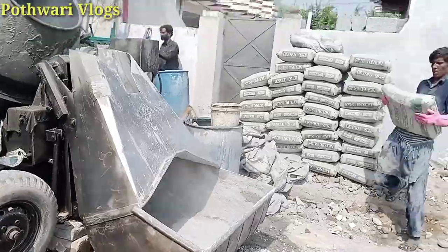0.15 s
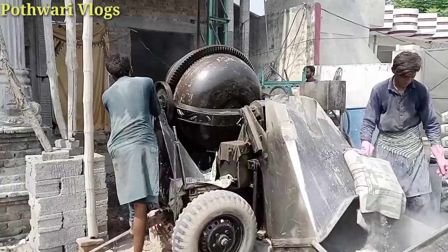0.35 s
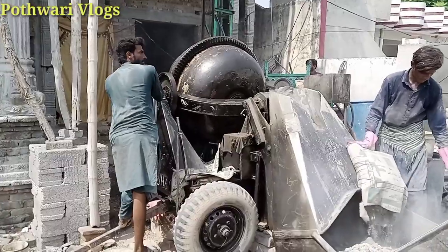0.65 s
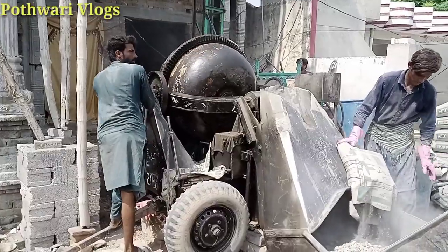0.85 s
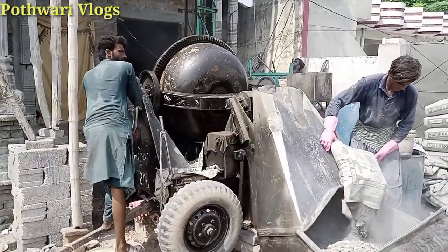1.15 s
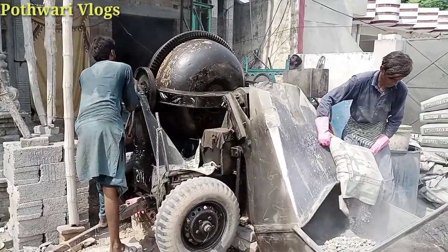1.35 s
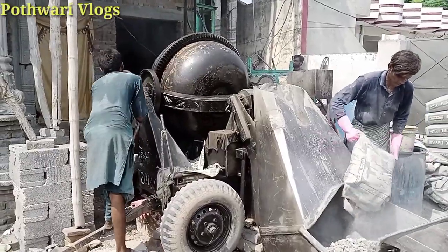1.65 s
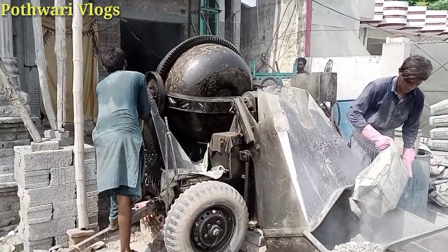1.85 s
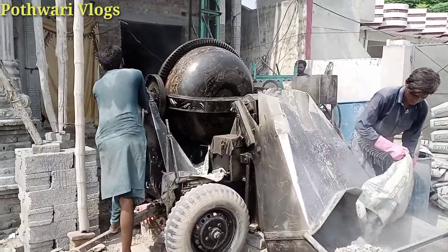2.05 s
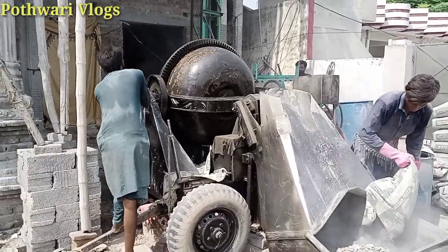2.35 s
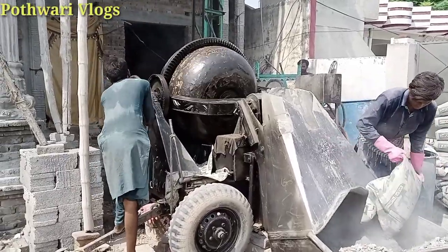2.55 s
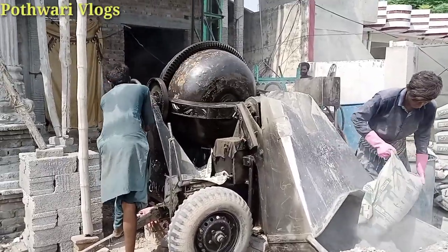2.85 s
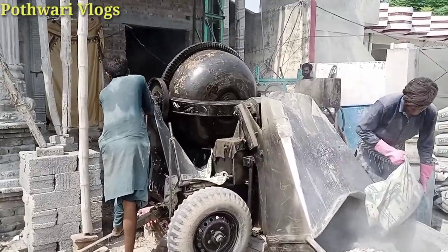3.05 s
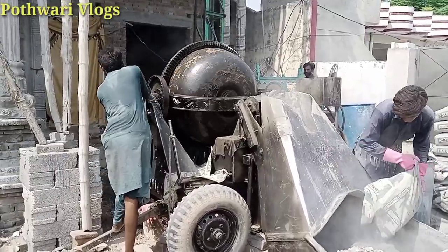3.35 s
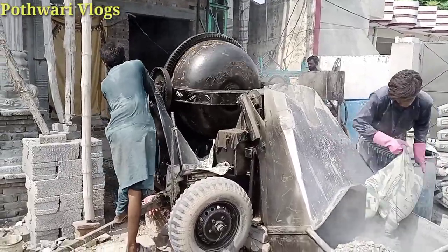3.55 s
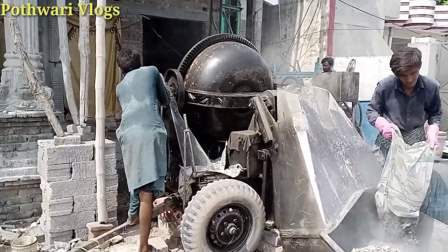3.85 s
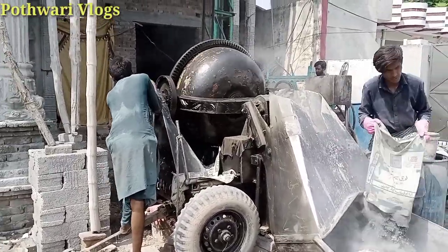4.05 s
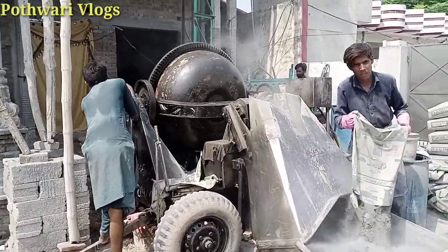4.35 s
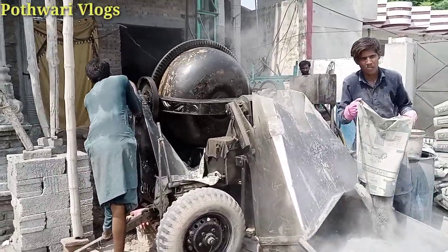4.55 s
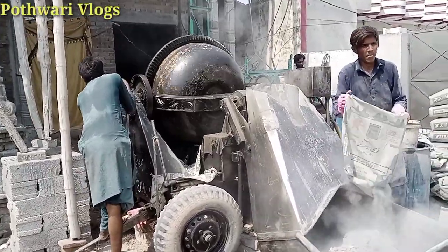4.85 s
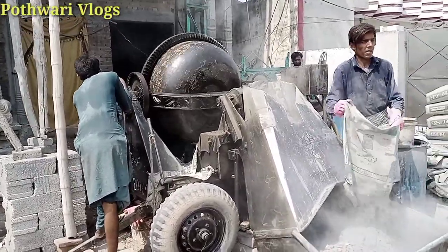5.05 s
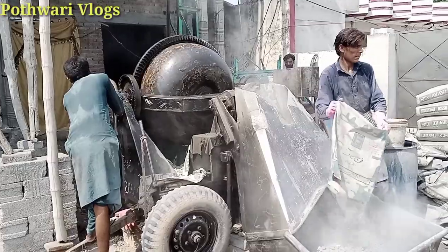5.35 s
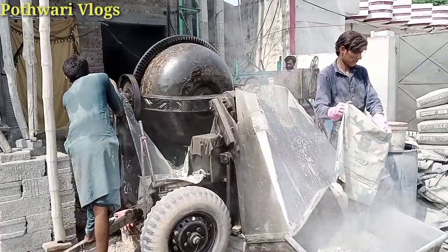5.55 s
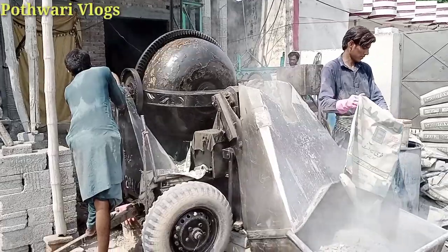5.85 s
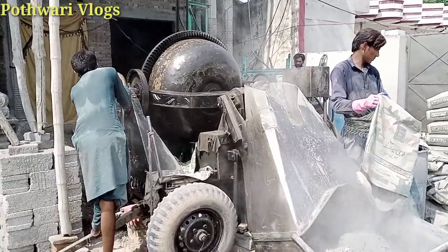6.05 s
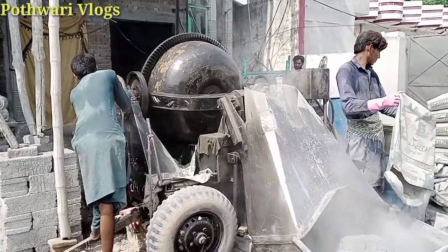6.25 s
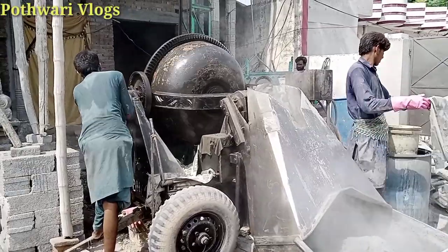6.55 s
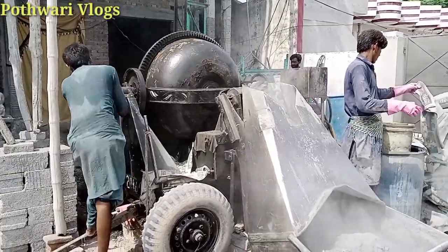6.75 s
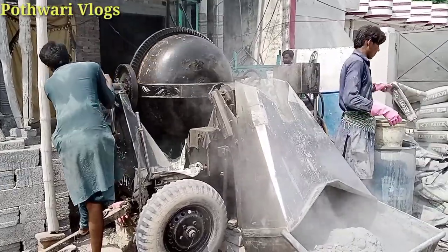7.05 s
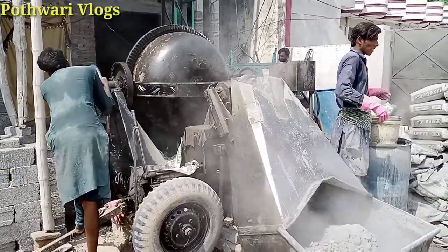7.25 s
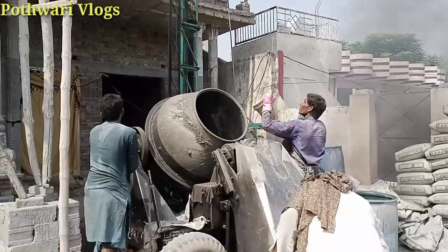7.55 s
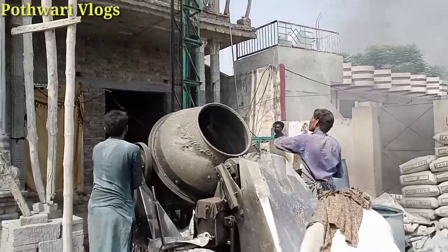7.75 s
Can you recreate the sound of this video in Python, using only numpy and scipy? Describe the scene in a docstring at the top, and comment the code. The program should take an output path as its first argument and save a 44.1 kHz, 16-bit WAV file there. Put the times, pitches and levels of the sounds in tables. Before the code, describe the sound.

A small diesel engine chugs and clatters steadily on a churning concrete mixer, with a couple of bumps on its steel hopper.

```python
"""A concrete mixer on an open building site. From the start the drum churns, its ring gear grinds and its shell
hums now and then; grit rattles briefly in the steel hopper under a few light bumps. A single-cylinder diesel
fires about ten times a second: an injector tick, then an exhaust thud and a combustion knock that sets the
casing clattering. The hopper is bumped hard at 1.8 s and more softly, with a dull thud, at 5.8 s. From 7.6 s
the engine is closer and faster, about 14 firings a second."""
import sys
import numpy as np
from scipy import signal
from scipy.fft import rfft, irfft, next_fast_len
from scipy.io import wavfile

SR = 44100
rng = np.random.default_rng(int(sys.argv[2]) if len(sys.argv) > 2 else 0)


def wrap_up_sound(samples):
    """Save the sound to the file named by the first command line argument, as 16-bit audio."""
    columns = np.atleast_2d(samples).T
    # keep every value between -1 and 1, then stretch to whole-number steps
    tamed = np.clip(columns, -1, 1)
    steps = np.round(tamed * 32767).astype(np.int16)
    wavfile.write(sys.argv[1], SR, steps)


N = 348554
TIME = np.arange(N) / SR

# Contacts of one firing, injector first. Each row: lag after the knock in seconds, ring in dB, crack in dB.
CONTACTS = [(-.0105, -13.5, -4.5), (0.0, -4, 0.5), (.009, -3.5, -1), (.019, -3, -3), (.034, -5, -4)]
# Colour of casing and guards. Each row: frequency in Hz, relative level in dB.
CASING_COLOUR = [(200, -50), (550, -48), (1150, -20), (1400, -11), (1850, -12), (2300, -4.5), (2900, -9),
                 (3600, -11.5), (5000, -9.5), (7100, -8.5), (8100, -22), (10000, -31), (13000, -71),
                 (15300, -32.5)]
# Decay of their clatter. Each row: frequency in Hz, t60 in seconds.
CASING_DECAY = [(300, 0.22), (1400, 0.19), (2500, 0.22), (4000, 0.22), (7000, 0.15), (9000, 0.13),
                (15000, 0.024)]


def from_db(db):
    """Decibels to gain."""
    return 10 ** (np.asarray(db) / 20)


def at_time(points, times=TIME):
    """Read a table on a time axis."""
    return np.interp(times, *np.transpose(points))


def at_hz(points, hz):
    """Read a table on a log-frequency axis."""
    f, value = np.transpose(points)
    return np.interp(np.log(np.maximum(hz, 1e-3)), np.log(f), value)


def noise(colour):
    """Coloured noise, rms 1."""
    size = next_fast_len(N)
    gain = from_db(at_hz(colour, np.fft.rfftfreq(size, 1 / SR)))
    x = irfft(rfft(rng.standard_normal(size)) * gain, size)[:N]
    return x / np.std(x)


def drift(rate_hz):
    """Random wander, standard deviation 1."""
    knots = rng.standard_normal(8000)
    x = np.interp(TIME * rate_hz, np.arange(len(knots)), knots)
    return x / np.std(x)


def clicks(times, sizes):
    """Single-sample impulses."""
    at = np.round(np.ravel(times) * SR).astype(int)
    inside = (at >= 0) & (at < N)
    return np.bincount(at[inside], np.ravel(sizes)[inside], N) + 1e-18


def ring(hits, hz, t60_s):
    """One mode: a unit click starts a decaying sine of height 1."""
    r, w = np.exp(-np.log(1000) / (t60_s * SR)), 2 * np.pi * hz / SR
    return signal.lfilter([0, np.sin(w)], [1, -2 * r * np.cos(w), r * r], hits)


def decay(energy, t60_s):
    """Amplitude of a body that stores each blow's energy and loses it exponentially."""
    retained = np.exp(-2 * np.log(1000) / (t60_s * SR))
    return np.sqrt(signal.lfilter([1], [1, -retained], energy))


def drum():
    """The drum churns while its ring gear grinds in a narrow band."""
    # Each row: frequency in Hz, relative level in dB.
    churn_colour = [(24, -35), (40, -38), (95, -9), (191, 0), (554, -13), (866, -2.5), (1200, -7.5),
                    (1420, 1), (1870, 3.5), (2640, 4.5), (5040, -4.5), (5560, -12.5), (6780, -5),
                    (11700, -49), (15000, -36)]
    gear_colour = [(900, -70), (1220, -6), (1330, 7), (1480, 9), (1650, -12.5), (2100, -43), (4000, -37)]
    # Each row: time in seconds, level in dB.
    levels = [(0.0, -37), (0.2, -41), (1.2, -38), (1.9, -37), (2.8, -38.5), (5.0, -37.5), (7.4, -37.5),
              (7.7, -44.5)]
    gear = noise(gear_colour)
    churn = from_db(1.25 * drift(70)) * noise(churn_colour)
    gear *= from_db(-9 + 1.5 * drift(30))
    return (churn + gear) * from_db(at_time(levels))


def grit():
    """Loose grit rattles dully on the hopper plate."""
    # Each row: time in seconds, level in dB.
    levels = [(0, -44), (.06, -43), (.1, -37), (.2, -38), (.32, -38), (.4, -46), (.5, -90)]
    # Each row: frequency in Hz, relative level in dB.
    colour = [(600, -21), (1500, -3), (2100, -1.5), (2450, 2.5), (3000, -25), (6000, -45), (11000, -75)]
    return from_db(at_time(levels) + 2.6 * drift(120)) * noise(colour)


def drum_hums(faint_per_s=4.2, swell_s=.027):
    """The turning drum's shell swells into short, rough, hollow rings."""
    # Each row: peak time in seconds, pitch in Hz, level in dB.
    loud_hums = [(0.78, 715, -40), (0.94, 724, -43), (0.98, 1415, -42), (4.0, 1285, -40),
                 (4.589, 796, -43.5), (5.32, 721, -39), (6.051, 1320, -38.5), (6.18, 717, -43.5),
                 (6.36, 1275, -39), (6.58, 710, -45)]
    # Each row: frequency in Hz, level in dB.
    shell_modes = [(718, -45), (800, -50), (890, -48), (1350, -44)]
    waver_cycles = .1 * drift(150)
    faint_hums = []
    for slot, (offset, pick, luck) in enumerate(rng.random((80, 3))):
        s = (slot + offset) / faint_per_s
        hz, db = shell_modes[int(pick * len(shell_modes))]
        if s < TIME[-1]:
            faint_hums.append((s, hz, db + 2 * luck - 1))
    out = np.zeros(N)
    for s, hz, db in loud_hums + faint_hums:
        span = np.abs(TIME - s) < .2
        t = TIME[span] - s
        swell = from_db(db) * np.exp(-(t / swell_s) ** 2 / 2)
        out[span] += swell * np.sin(2 * np.pi * (hz * t + waver_cycles[span]))
    return out * from_db(2.5 * drift(110))


def firings(first_s=.089, spread_db=(2.04, 1.93, 1)):
    """One firing per engine cycle. Returns times in seconds and ring, crack and thud levels in dB."""
    # Each row: time in seconds, firings per second.
    speed = [(0.0, 10.163), (0.36, 10.159), (0.43, 11.584), (0.7, 9.983), (1.5, 9.815), (2.4, 9.589),
             (3.3, 9.611), (4.2, 9.631), (4.9, 9.541), (5.5, 9.658), (6.5, 9.646), (7.53, 9.664),
             (7.58, 14.339)]
    # Each row: time in seconds, metallic ring in dB, sharp crack in dB, exhaust thud in dB.
    effort = [(0.1, -35, -52, -50), (0.38, -42, -46.5, -55), (0.75, -32.5, -35, -54.5),
              (1.25, -35.5, -40.5, -55), (2.0, -30.5, -33, -46.5), (2.75, -33, -36, -51.5),
              (3.25, -30, -31, -52), (3.7, -31, -34, -52), (4.2, -28.5, -32.5, -49.5),
              (4.8, -33, -35, -51.5), (5.3, -30.5, -31.5, -52.5), (5.8, -34, -35, -49.5),
              (6.3, -31.5, -34.5, -48), (6.9, -30, -33.5, -55.5), (7.48, -37, -39, -51.5),
              (7.58, -35, -33, -51.5), (7.7, -29.5, -22, -43.5), (7.9, -27.5, -23, -49)]
    # Each row: time in seconds, extra ring in dB, extra crack in dB.
    hard_knocks = [(1.98, 0, 1.5), (2.29, 3, 0.5), (2.6, 3.5, 0), (4.16, 3.5, 0), (4.89, 7.5, -1.5),
                   (5.2, 4, -1.5), (6.24, 2, 3), (6.97, 2, 6), (7.38, 9.5, 6.5)]
    cycles = np.cumsum(at_time(speed)) / SR
    cycles -= np.interp(first_s, TIME, cycles)
    s = np.interp(np.arange(int(cycles[-1]) + 1), cycles, TIME)
    effort_s, *effort_db = np.transpose(effort)
    level_db = np.transpose([np.interp(s, effort_s, column) for column in effort_db])
    level_db += np.sqrt(3) * rng.uniform(-1, 1, level_db.shape) * spread_db
    for knock_s, ring_db, crack_db in hard_knocks:
        level_db[np.argmin(abs(s - knock_s))] += [ring_db, crack_db, 0]
    return (s, *level_db.T)


def nearness(times):
    """How close the engine is."""
    # Each row: time in seconds, nearness from 0 to 1.
    approach = [(7.565, 0), (7.7, 1)]
    return at_time(approach, times)


def pipes(fired, gulp_t60_s=.17):
    """Gulps of air set the intake and exhaust pipes hooting."""
    # Each row: frequency in Hz, lag after the knock in seconds, level in dB, t60 in seconds.
    pipe_modes = [(878.5, -0.032, -42, 0.098), (714, .012, -42.5, 0.048), (922, -0.0013, -64, 0.13),
                  (720, 0.019, -50, .16), (337.6, -0.0079, -59, 0.21), (489, -0.036, -63, 0.26)]
    # Each row: time in seconds, gain in dB.
    hoot_gain = [(0, 1), (.8, -2.5), (1.5, -4), (2.1, -3.5), (3.8, -1.5), (4.5, 0), (6.5, 2), (7.4, 0),
                 (7.7, -13)]
    s, out = fired[0], np.zeros(N)
    gulp_norm = np.sqrt(gulp_t60_s * SR / (2 * np.log(1000)))
    for hz, lag_s, db, t60_s in pipe_modes:
        sizes = from_db(db + at_time(hoot_gain, s) + 2 * rng.uniform(-.53, 1, len(s)))
        gulps = decay(clicks(s + lag_s, sizes ** 2), gulp_t60_s) * rng.standard_normal(N)
        out += ring(gulps / gulp_norm, hz, t60_s)
    return out


def hopper(thud_t60_s=.22, boom_t60_s=.21, scrape_t60_s=.26, push_t60_s=.07):
    """A bump swells as the load settles; the plate thuds, booms, clangs and is scraped by grit."""
    # Each row: peak time in seconds, thud, boom, clang and scrape in dB, rise in seconds.
    bumps = [(0.074, -62, -59, -36.5, -40, .006), (.1, -44, -61, -36.5, -40, .006),
             (0.254, -61, -58, -48, -52, 0.0065), (.3, -58, -49, -41, -46, 0.011),
             (.335, -62, -51, -38.5, -59, 0.014), (1.77, -48, -43, -44, -30, 0.021),
             (1.799, -46, -24.5, -41.5, -24, 0.021), (1.826, -39, -33, -45, -26.5, .006),
             (1.85, -34.5, -35, -52, -29, .008), (5.825, -33.5, -65, -41, -38, 0.035)]
    # Each row: frequency in Hz, level in dB, t60 in seconds.
    plate_modes = [(776, -5, 0.21), (854, -8.5, 0.22), (850, -1, 0.19), (922.5, 8.5, 0.12),
                   (1350, -7, 0.46), (1718, 6.5, 0.076)]
    # Three colours. Each row: frequency in Hz, relative level in dB.
    thud_colour = [(60, -28), (130, -21), (200, 0), (320, -2), (430, -17), (800, -67), (5000, -81)]
    boom_colour = [(150, -40), (270, -10), (340, 1), (410, -7.5), (490, -7), (580, -8), (740, -7),
                   (1150, -14), (2000, -28), (8000, -70)]
    scrape_colour = [(400, -32), (1100, -8.5), (1450, 4), (2000, -1.5), (3200, -7), (4800, -0.5),
                     (7200, -11), (9000, -31), (14000, -47)]
    thud_power, boom_power, scrape_power, push = np.zeros((4, N))
    for s, thud_db, boom_db, clang_db, scrape_db, rise_s in bumps:
        swell = np.exp(np.clip((TIME - s) * 2 / rise_s, -20, 0))
        age_s = np.clip(TIME - s, 0, .5)
        thud_power += (swell * from_db(thud_db - 60 * age_s / thud_t60_s)) ** 2
        boom_power += (swell * from_db(boom_db - 60 * age_s / boom_t60_s)) ** 2
        scrape_power += (swell * from_db(scrape_db - 60 * age_s / scrape_t60_s)) ** 2
        force = swell * from_db(-60 * age_s / push_t60_s)
        push += from_db(clang_db) * force / np.linalg.norm(force)
    clang = sum(from_db(db) * ring(push * rng.standard_normal(N) + 1e-18, hz, t60_s)
                for hz, db, t60_s in plate_modes)
    scrape = np.sqrt(scrape_power) * noise(scrape_colour) * from_db(2.5 * drift(300))
    thud = np.sqrt(thud_power) * noise(thud_colour)
    boom = np.sqrt(boom_power) * noise(boom_colour)
    return thud + boom + scrape + clang


def pings(times, level_db, centre_hz, scatter_hz, t60_s, spread_db, rise_s=.00024):
    """One metallic ping per firing, scattered in pitch and strength."""
    out, t = np.zeros(N + SR), np.arange(SR // 5) / SR
    envelope = (1 - np.exp(-t / rise_s)) * from_db(-60 * t / t60_s)
    for s, db, (detune, luck) in zip(times, level_db, rng.uniform(-.948, 1, (len(times), 2))):
        at = int(s * SR)
        tone = np.sin(2 * np.pi * (centre_hz + scatter_hz * detune) * t)
        out[at:at + len(t)] += from_db(db + spread_db * luck) * envelope * tone
    return out[:N]


def injector_and_piston(fired):
    """The injector ticks; the piston then slaps the liner with a clank and a clink, and rebounds."""
    s, ring_db, crack_db, _ = fired
    tick_s, rebound_s = s + CONTACTS[0][0], s + CONTACTS[3][0]
    capped_db = np.minimum(crack_db, -31)
    tick = pings(tick_s, capped_db - 7, centre_hz=8140, scatter_hz=1440, t60_s=.064, spread_db=7.5)
    clank = pings(s, ring_db + 4.5, centre_hz=2950, scatter_hz=349, t60_s=.085, spread_db=3.5)
    clink = pings(s, capped_db - .5, centre_hz=5950, scatter_hz=1500, t60_s=.088, spread_db=6.5)
    rebound = pings(rebound_s, ring_db - .5, centre_hz=2526, scatter_hz=328, t60_s=.21, spread_db=7)
    return tick + clank + clink + rebound


def contact_sizes(fired, hz, spread_db, near_tick_db=6):
    """Strength of every contact at one frequency: ring levels below, crack levels above."""
    s, ring_db, crack_db, _ = fired
    _, ring_share_db, crack_share_db = np.transpose(CONTACTS)
    crack_mix = np.interp(hz, [3200, 4200], [0, 1])
    level_db = (1 - crack_mix) * (ring_db[:, None] + ring_share_db)
    level_db += crack_mix * (crack_db[:, None] + crack_share_db)
    level_db[:, 0] += near_tick_db * nearness(s)
    per_firing = rng.uniform(-1, 1, (len(s), 1))
    per_contact = .5 * rng.uniform(-1, 1, level_db.shape)
    luck = from_db(spread_db * (per_firing + per_contact))
    return from_db(level_db) * luck / np.sqrt(np.mean(luck ** 2))


def casing(fired, contact_s, travel_s=.003, modes=44, spread_db=10, t60_share=.38):
    """Covers and guards lie differently on each stroke, so each firing clanks at its own pitches."""
    size, out = SR // 4, np.zeros(N + SR)
    edges_hz = np.linspace(1500, 10500, modes + 1)
    pitches_hz = edges_hz[:-1] + np.diff(edges_hz) * rng.random((len(contact_s), modes))
    luck = from_db(spread_db * (2 * rng.random(pitches_hz.shape) - 1))
    gains = from_db(2.6 + at_hz(CASING_COLOUR, pitches_hz)) * luck / np.sqrt(np.mean(luck ** 2))
    arrival_s = contact_s[:, None] + travel_s * rng.random((len(contact_s), modes, len(CONTACTS)))
    ringing = contact_sizes(fired, hz=2500, spread_db=1)
    cracking = contact_sizes(fired, hz=5000, spread_db=1)
    for k, arrivals in enumerate((arrival_s * SR).astype(int)):
        start = arrivals.min()
        for at, hz, gain in zip(arrivals, pitches_hz[k], gains[k]):
            sizes = gain * (ringing[k] if hz < 3700 else cracking[k])
            hits = np.bincount(at - start, sizes, size)[:size]
            out[start:start + size] += ring(hits, hz, t60_share * at_hz(CASING_DECAY, hz))
    return out[:N]


def block(fired, contact_s, gain_db=-7.5, travel_s=.004):
    """Each contact reaches the block and flywheel modes as bending waves, a few milliseconds late."""
    # Each row: frequency in Hz, level in dB, t60 in seconds, change when near in dB.
    block_modes = [(1880, -16, .1, 13), (2325, -6, .12, 3), (2383, -2, .13, 0), (2570, -4, .12, 0),
                   (2699, 1, .12, -3), (2790, -3, .09, 3), (2890, 0, .11, 0), (3050, -3, .08, 0),
                   (3200, 0, .1, -4), (3700, -10, .09, 3), (4014, -9, .14, 6), (4950, -8, .08, -5),
                   (5302, -4, .1, -6), (6067, -7, .09, -3), (6310, -8, .08, 0), (7003, -4, .07, -3)]
    out = np.zeros(N)
    for hz, db, t60_s, near_db in block_modes:
        sizes = from_db(gain_db + db + near_db * nearness(contact_s))
        sizes *= contact_sizes(fired, hz, spread_db=7)
        arrival_s = contact_s + travel_s * rng.random(contact_s.shape)
        out += ring(clicks(arrival_s, sizes), hz, t60_s)
    return out


def clatter(fired, contact_s, onset_hz=160, fizz_db=14):
    """Countless small rattles blur into a wash that dies band by band and carries the top treble."""
    size = next_fast_len(N)
    spectrum, bins_hz = rfft(noise(CASING_COLOUR), size), np.fft.rfftfreq(size, 1 / SR)
    centres_hz = np.r_[400, np.geomspace(1300, 15000, 11)]
    out = np.zeros(N)
    for hz, weights in zip(centres_hz, np.eye(len(centres_hz))):
        band = irfft(spectrum * np.interp(bins_hz, centres_hz, weights), size)[:N]
        blows = clicks(contact_s, contact_sizes(fired, hz, spread_db=4) ** 2)
        energy = signal.lfilter(*signal.butter(1, onset_hz, fs=SR), blows)
        lift = from_db(fizz_db) if hz > 10500 else 1
        out += lift * band * decay(energy, at_hz(CASING_DECAY, hz))
    return out * from_db(-3 + 1.5 * drift(350))


def exhaust(fired, puff_db=4.5, throb_db=-8.5, near_throb_db=18.5, rush_db=-4.5, lowpass_hz=420):
    """Each firing sends a pressure puff that bounces in the silencer, with a rush of gas behind it."""
    # Each row: lag after the knock in seconds, relative level in dB.
    bounces = [(-.007, 6.5), (.008, -3.5), (0.025, -11.5)]
    # Each row: frequency in Hz, relative level in dB.
    rush_colour = [(25, -24), (45, -37), (65, 7), (120, 2.5), (200, -6), (350, -3.5), (600, -16),
                   (1500, -60)]
    s, _, _, thud_db = fired
    lag_s, share_db = np.transpose(bounces)
    times = s[:, None] + lag_s
    sizes = from_db(thud_db[:, None] + share_db + rng.standard_normal(times.shape))
    puffs = from_db(puff_db) * ring(clicks(times - .0015, sizes), hz=150, t60_s=.015)
    throb_sizes = sizes * from_db(throb_db + near_throb_db * nearness(times))
    throb = ring(clicks(times - .003, throb_sizes), hz=72, t60_s=.06)
    rush = from_db(rush_db) * noise(rush_colour) * decay(clicks(times, sizes ** 2), t60_s=.36)
    return signal.sosfilt(signal.butter(2, lowpass_hz, fs=SR, output="sos"), puffs + throb) + rush


def guard_chatter(gain_db=-30.5, sing_db=-2):
    """From close by the guards chatter without a break, and one of them sings."""
    # Each row: frequency in Hz, relative level in dB.
    colour = [(1200, -30), (1750, -3), (2400, -14), (3500, 3), (7000, 0), (8500, -8), (11500, -19.5),
              (15500, -32)]
    chatter = noise(colour) * from_db(2 * drift(300))
    sing = ring(chatter, hz=4014, t60_s=.094)
    return nearness(TIME) * from_db(gain_db) * (chatter + from_db(sing_db) * sing / np.std(sing))


def scene(top_cutoff_hz=10700):
    """Engine, drum and hopper in mono."""
    fired = firings()
    knock_s, lag_s = fired[0], np.transpose(CONTACTS)[0]
    # later rebounds are less punctual
    contact_s = knock_s[:, None] + lag_s * (1 + .1 * rng.standard_normal((len(knock_s), len(lag_s))))
    soften_top = signal.butter(6, top_cutoff_hz, fs=SR, output="sos")  # dulls the clanks' top treble
    struck = signal.sosfilt(soften_top, casing(fired, contact_s) + block(fired, contact_s))
    metal = struck + clatter(fired, contact_s) + injector_and_piston(fired) + guard_chatter()
    engine = metal + exhaust(fired) + pipes(fired)
    return (engine + drum() + drum_hums() + hopper() + grit())[None]


def record(dry, highpass_hz=48, lowpass_hz=15800):
    """The microphone sheds deep bass; the top is cut steeply."""
    thin = signal.sosfilt(signal.butter(2, highpass_hz, "high", fs=SR, output="sos"), dry)
    return signal.sosfilt(signal.ellip(10, .2, 80, lowpass_hz, fs=SR, output="sos"), thin)


dry = scene()
out = record(dry)
wrap_up_sound(out)
```